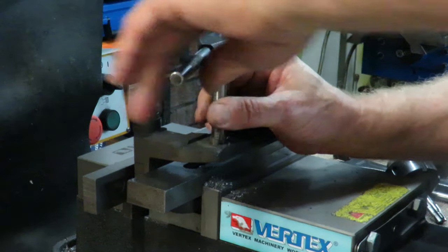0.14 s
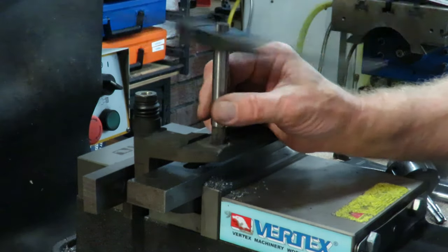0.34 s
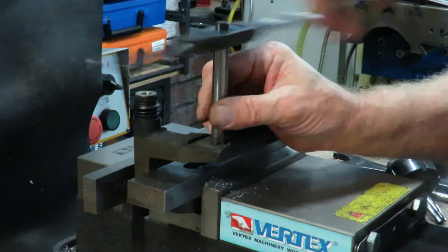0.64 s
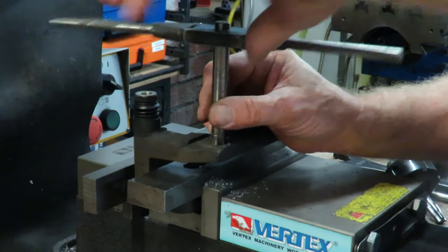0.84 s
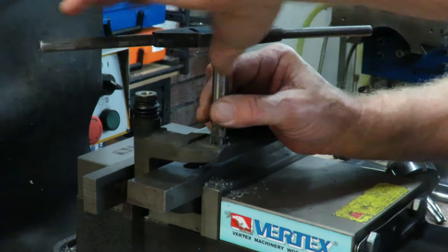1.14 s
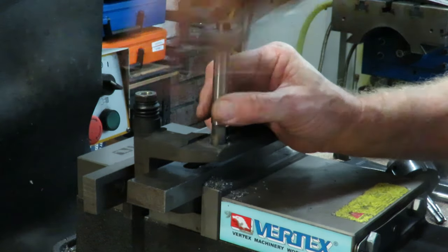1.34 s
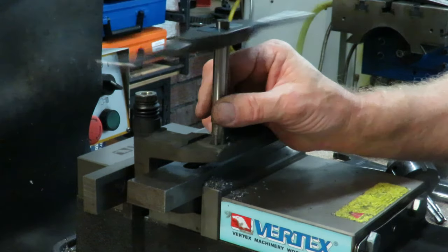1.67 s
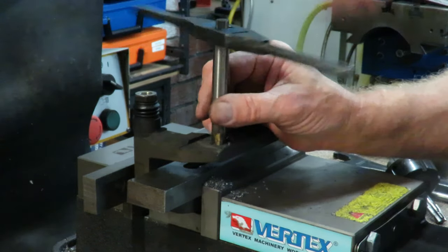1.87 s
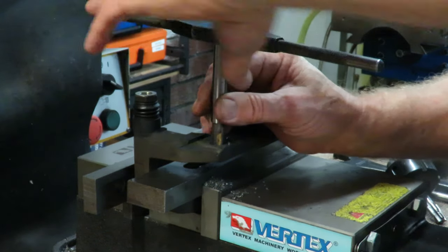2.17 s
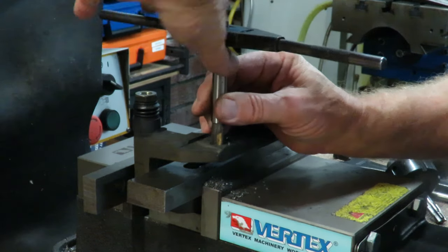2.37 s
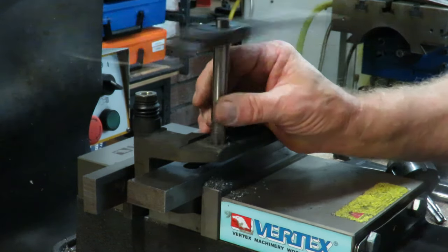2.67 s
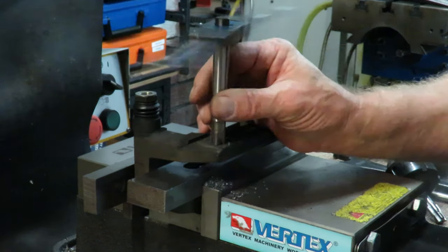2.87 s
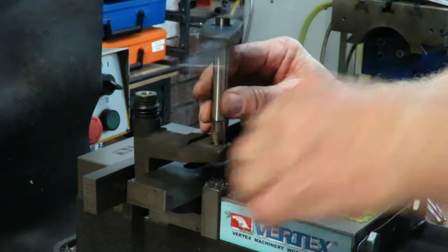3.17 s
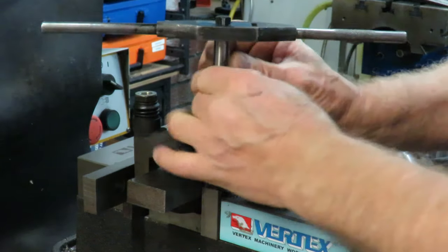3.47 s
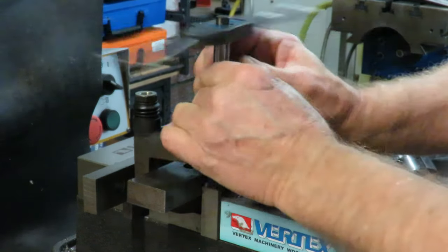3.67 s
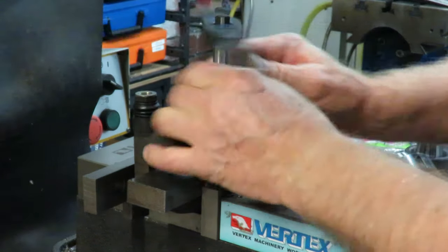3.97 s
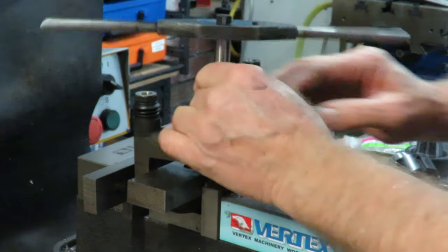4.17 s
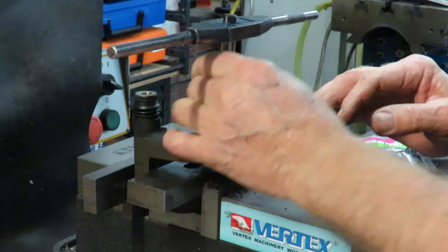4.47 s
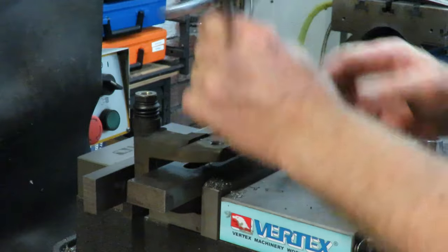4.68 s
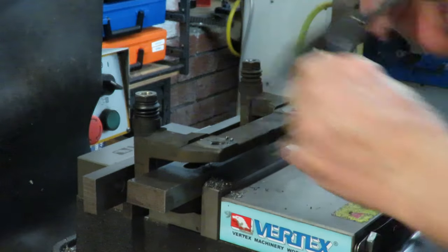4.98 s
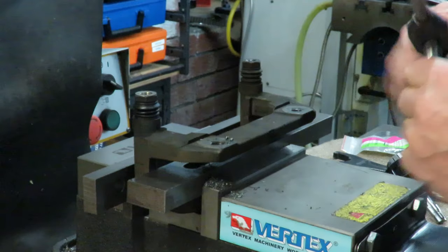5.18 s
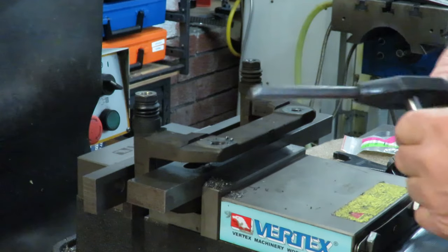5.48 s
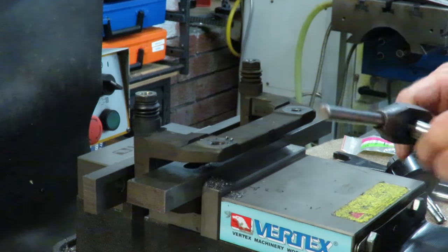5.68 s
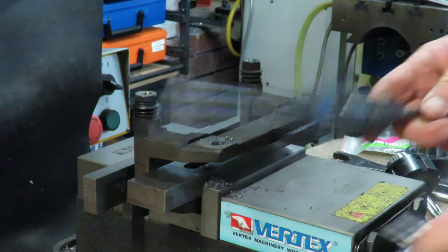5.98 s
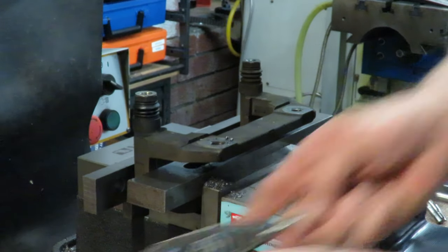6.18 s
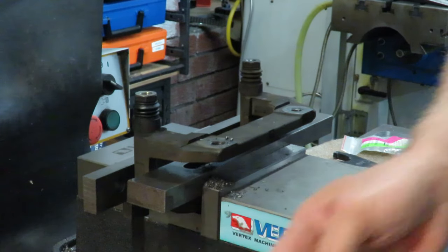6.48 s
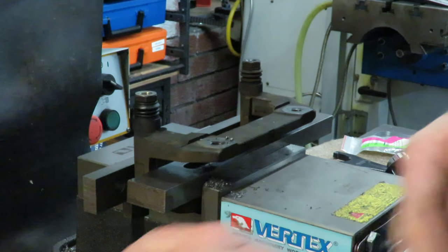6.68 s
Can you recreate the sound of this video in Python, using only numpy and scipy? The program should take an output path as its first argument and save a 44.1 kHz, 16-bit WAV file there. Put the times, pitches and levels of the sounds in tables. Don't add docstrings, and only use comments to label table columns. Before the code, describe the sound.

A close stereo microphone in a small, lightly echoing workshop, with quiet low fan wash and mains hum throughout. From 0 to 0.9 seconds a steel tap turning in a thread gives rough, throaty rasps and hollow knocks, strongest around 0.35 and 0.7. Softer bursts follow at 1.4-1.8 and 2.6-3.0, with near-quiet between them. From 3.1 to 4.7 the loosened tap rocks: faint scrapes, dulled clicks and sharper knocks near 3.85 and 4.3. At 4.79 it comes free with a loud, heavy clunk, low ring and thin high ping, stopped at 5.1 by a firm, ringing catch. Quiet follows, with faint grip ticks. Around 5.8 a soft hiss rises in pitch, then a small bright graze at 5.92. From 6.4 to 6.8 the wrench lands with a woody thump and sharp, jangling clatter among loose tools, briefly buzzing before settling into the hum.

```python
import sys
import numpy as np
from scipy import signal
from scipy.fft import rfft, irfft, next_fast_len
from scipy.io import wavfile
from scipy.ndimage import uniform_filter1d

SR = 44100
rng = np.random.default_rng(int(sys.argv[2]) if len(sys.argv) > 2 else 0)


def store_pcm(level_fs):
    pcm = np.round(np.clip(level_fs, -1, 1) * 32767).astype(np.int16)
    wavfile.write(sys.argv[1], SR, np.atleast_2d(pcm).T)


def gain_from_db(level_db):
    decades = np.asarray(level_db, float) / 20
    return 10 ** decades


N = 300753

# (pitch [Hz], level [dB], time to fall 60 dB [s])
HELD = [(313, -8.5, 0.22), (647, -4.5, 0.55), (976, -12, 0.18), (1286, 1, 0.1), (1500, -6, 0.181),
        (1980, -6, 0.11), (2432, 3.5, 0.054), (3090, 4.5, 0.058), (3540, 1.5, 0.032)]


def evened(x):
    return x / np.sqrt(np.mean(x ** 2) + 1e-20)


def read(points, hz):
    f, value = np.transpose(points)
    return np.interp(np.log(hz + 1), np.log(f + 1), value)


def colour(x, points):
    n = next_fast_len(len(x))
    gain = gain_from_db(read(points, np.fft.rfftfreq(n, 1 / SR)))
    return irfft(rfft(x, n) * gain, n)[:len(x)]


def add(mix, s, sound):
    part = mix[round(s * SR):][:len(sound)]
    part += sound[:len(part)]


def drift(count, size):
    smoothed = uniform_filter1d(rng.standard_normal(count), size=size)
    return evened(uniform_filter1d(smoothed, size=size))


def swell(t, s, db, rise, fade):
    return gain_from_db(db - 30 * np.maximum((s - t) / rise, (t - s) / fade).clip(0, 9))


def resonate(x, peaks):
    out = np.zeros(len(x))
    for k, (hz, width, db) in enumerate(peaks):
        pole = np.exp((2j * hz - width) * np.pi / SR)
        mode = 2 * signal.lfilter([1 - abs(pole)], [1, -pole], x).real
        out += (-1) ** k * gain_from_db(db) * mode
    return out


def wander(x, hz, width):
    turn = np.exp(2j * np.pi * np.cumsum(hz) / SR)
    r = np.exp(-np.pi * width / SR)
    return 2 * (turn * signal.lfilter([1 - r], [1, -r], x / turn)).real


def slips(per_s, spread_db, clump_db, smooth):
    size = gain_from_db(spread_db * np.minimum(rng.exponential(1, N), 4)) * rng.choice([-1, 1], N)
    clumps = uniform_filter1d(rng.standard_normal(N), size=500)
    clumps = evened(uniform_filter1d(clumps, size=300))
    hits = evened(size * (rng.random(N) < per_s / SR))
    hits = hits + smooth * rng.standard_normal(N)
    return evened(hits * gain_from_db(clump_db * clumps))


def knocks(rows, modes, rings_db, crack_db, t60, thud_slow, tick_slow, split_hz, thud_hz, rise, rattle, size=12000):
    out, t = np.zeros(N), np.arange(size) / SR
    hz, ring_db, ring_t60 = np.transpose(modes)[:, :, None]
    low = [(.55 * thud_hz, -32), (thud_hz, -2.5), (1200, 0), (2200, -30)]
    high = [(4500, -9.0), (6500, -7.5), (12000, -7.5), (13500, -5.0), (15500, -11)]
    dying = gain_from_db(ring_db - 60 * t / ring_t60) * np.sin(2 * np.pi * hz * t)
    crack = gain_from_db(crack_db - 60 * t / .012)
    for s, db, thud_db, tick_db, clack_hz in rows:
        clack = [(.3 * clack_hz, -32), (.7 * clack_hz, -9), (clack_hz, 0),
                 (1.4 * clack_hz, -9), (3 * clack_hz, -30)]
        thud, mid, tick = (evened(colour(rng.standard_normal(len(t)), shape)) for shape in (low, clack, high))
        sound = gain_from_db(thud_db) * thud * (1 - np.exp(-t / 0.0031)) * gain_from_db(-60 * t / (t60 * thud_slow))
        sound += mid * (gain_from_db(-60 * t / t60) + crack)
        sound += 1.8 * np.sin(2 * np.pi * clack_hz * t) * gain_from_db(-60 * t / .035)
        sound += gain_from_db(tick_db) * tick * (gain_from_db(-60 * t / (t60 * tick_slow)) + crack)
        place, apart = rng.standard_normal((2, len(modes), 1))
        beats = .6 + .4 * np.cos(2 * np.pi * split_hz * (1 + .1 * apart) * t)
        beats = beats + rattle * np.repeat(drift((len(modes), len(t) // 50), size=4), 50, axis=1)
        rings = gain_from_db(place) * beats * dying
        sound += gain_from_db(rings_db + 10.0) * rings.sum(0)
        add(out, s, gain_from_db(db - 13.5) * (1 - np.exp(-t / rise)) * sound)
    return out


def workshop():
    # (pitch [Hz], level [dB])
    air = [(25, -14), (69, -29), (101, -1.5), (169, -15.5), (204, -8), (267, -11), (399, -4.5),
           (560, -13.5), (1020, -16), (11500, -43), (15500, -51)]
    # (pitch [Hz], likeness [-1 to 1])
    likeness = [(40, 0.98), (70, 0.95), (150, 0.44), (380, -0.37), (950, -0.15), (2380, -0.0), (5980, 0.09),
                (15000, 0.06)]
    # (pitch [Hz], width [Hz], level [dB])
    hum = [(99.5, 6.8, -59), (198.8, 10, -59.5), (311, 4.6, -63.5), (388, 7.3, -75.5)]
    frames, hz = N // 256 + 5, np.fft.rfftfreq(1024, 1 / SR)
    a, b, c, d, patches = rng.standard_normal((frames, 513, 5)).T
    patches = uniform_filter1d(patches, size=12, axis=0)
    patches = evened(uniform_filter1d(patches, size=14, axis=1))
    same = np.clip(read(likeness, hz), -1, 1)[:, None]
    left = a + 1j * b
    right = same * left + np.sqrt(1 - same ** 2) * (c + 1j * d)
    z = np.array([left, right]) * gain_from_db(read(air, hz)[:, None] + 1.4 * patches)
    wash = gain_from_db(-49.5) * evened(signal.istft(z, nperseg=1024, noverlap=768)[1][:, :N])
    t = np.arange(N) / SR + rng.random()
    for line in hum:
        waver = evened(resonate(rng.standard_normal(N), [line]))
        wash += gain_from_db(line[2]) * (1.25 * np.sin(2 * np.pi * line[0] * t) + .4 * waver)
    return wash


def room(x):
    # (pitch [Hz], time to fall 60 dB [s])
    shop = [(150, 0.31), (500, 0.48), (2000, 0.34), (6000, 0.35), (14000, 0.18)]
    taps = np.zeros((2, SR // 2))
    at = np.arange(200, SR // 2 - 20, 20) + rng.integers(0, 20, (2, (SR // 2 - 201) // 20))
    np.put_along_axis(taps, at, rng.choice([-1., 1.], at.shape), 1)
    hz, t, z = signal.stft(taps, SR, nperseg=256)
    tail = signal.istft(z * gain_from_db(-60 * t / read(shop, hz)[:, None]), SR, nperseg=256)[1]
    return signal.fftconvolve(x[None], tail / np.linalg.norm(tail[0]), axes=1)[:, :N]


def brush():
    t, peak_s, width_hz = np.arange(N) / SR, 5.82, 4900
    hz = np.clip(4200 + 56000 * (t - peak_s), 1500, 6000)
    hiss = wander(wander(rng.standard_normal(N), hz, width_hz), hz, width_hz)
    return evened(hiss) * swell(t, peak_s, db=-41, rise=.09, fade=0.048)


def singing():
    t = np.arange(N) / SR
    return np.sqrt(2) * np.sin(2 * np.pi * 4228 * t) * swell(t, 6.63, db=-35, rise=.15, fade=.1)


def chatter(blows):
    # (pitch [Hz], width [Hz], level [dB])
    loose = [(3400, 260, -3), (4240, 160, -12), (5850, 160, -1), (7720, 260, -3), (10400, 260, -1),
             (10950, 260, -2), (12900, 500, -8), (14400, 800, -1)]
    t = np.arange(N) / SR
    buzz = evened(resonate(slips(per_s=900, spread_db=2.0, clump_db=3.0, smooth=.5), loose))
    power = sum(swell(t, s + 0.0014, db - 9.5, rise=0.0088, fade=0.069) ** 2 for s, db, *_ in blows)
    return buzz * np.sqrt(power)


def laid_on_bench():
    # (time [s], crack peak [dB], thud against it [dB], tick against it [dB], clack [Hz])
    blows = [
        (6.404, -26.5, -29, 8.5, 3520),
        (6.4235, -28, -5, -2, 3470),
        (6.4984, -19.5, -26, 9.5, 4330),
        (6.5288, -27.5, -5, 11.5, 3380),
        (6.6095, -23, 10, 10.5, 3930),
        (6.6304, -20, -16, 4, 4100),
        (6.6941, -20, -12, 3, 3620),
        (6.7984, -29.5, 1, -2, 4030),
    ]
    # (pitch [Hz], level [dB], time to fall 60 dB [s])
    tools = [(1034, -12, .1), (2750, -8, .05), (3480, -11, .06), (4237, -4, .04), (5800, -9, .06),
             (7000, -12, .04), (7790, -11, .06), (8699, -12, .05), (10300, -10, .08), (10900, -11, .07),
             (11740, -12, .06), (13360, -13, .06), (14300, -6, .05)]
    # (time [s], crack peak [dB], thud [dB], tick [dB], clack [Hz])
    thumps = [
        (6.396, -54.5, 10, -38, 1310),
        (6.4729, -26, 9.8, -48, 1310),
    ]
    # (pitch [Hz], level [dB], time to fall 60 dB [s])
    board = [(501, -18, 0.12), (774, 11, 0.011), (970, 8.5, 0.013), (1173, 2, 0.034), (1680, -4.5, 0.015)]
    rattles = knocks(blows, tools, rings_db=-3, crack_db=2.0, t60=0.08, thud_slow=0.62, tick_slow=0.9,
                     split_hz=22, thud_hz=496, rise=0.0012, rattle=0.35)
    body = knocks(thumps, board, rings_db=11.7, crack_db=8.0, t60=0.03, thud_slow=5.5, tick_slow=.8,
                  split_hz=5, thud_hz=480, rise=0.0004, rattle=0.071)
    return rattles + body + chatter(blows) + singing()


def touched_in_passing():
    # (time [s], crack peak [dB], thud against it [dB], tick against it [dB], clack [Hz])
    grazes = [
        (5.9182, -24.5, -23, 0.5, 3630),
        (5.9234, -27, -10, 8, 2530),
        (5.945, -33.5, -34, -27, 2820),
    ]
    # (pitch [Hz], level [dB], time to fall 60 dB [s])
    strap = [(2100, -14, .04), (2550, -9, .03), (2820, -5, .04), (3300, -4, .025), (3900, -9, .05),
             (5800, -15, .03), (6616, -14, .03), (10790, -6, .03)]
    return knocks(grazes, strap, rings_db=0.5, crack_db=9.0, t60=0.037, thud_slow=0.68, tick_slow=1.0,
                  split_hz=42, thud_hz=496, rise=0.00065, rattle=0.9)


def caught():
    # (time [s], crack peak [dB], thud against it [dB], tick against it [dB], clack [Hz])
    catches = [
        (5.0968, -16.5, -2, -1.5, 3430),
        (5.2689, -44.5, -4.5, -18, 4060),
    ]
    # (pitch [Hz], level [dB], time to fall 60 dB [s])
    handle = [(501, -8, .15), (670, -9, 0.15), (1150, -3, .06), (1292, -8, .2), (1440, 1, .2),
              (1900, -2, 0.1), (2126, -3, .1), (2998, -8, 0.2), (3440, -9, 0.22), (3630, -8, .18),
              (5860, -6, 0.16), (6002, -8, 0.14), (10200, -8, .12), (12820, -20, .12)]
    return knocks(catches, handle, rings_db=-9, crack_db=3.5, t60=0.18, thud_slow=1.06, tick_slow=0.85,
                  split_hz=12.04, thud_hz=576, rise=0.00042, rattle=0.13, size=SR // 2)


def ping(start_s):
    t = np.arange(N) / SR - start_s
    waver = 1 + 0.5 * drift(N, size=300)
    return (t > 0) * waver * gain_from_db(-37 - 60 * t.clip(0) / 0.7) * np.sin(2 * np.pi * 10918 * t)


def lifted_off():
    # (time [s], crack peak [dB], thud against it [dB], tick [dB], clack [Hz])
    blows = [
        (4.7874, -13.5, 14.5, -5, 1390),
        (4.794, -11, 0.5, 2.5, 3070),
        (4.7965, -18.5, -12, -15, 1965),
        (4.8344, -24, 16.5, -10.5, 1840),
        (4.8644, -35.5, 5.5, -16, 3140),
    ]
    # (pitch [Hz], level [dB], time to fall 60 dB [s])
    freed = [(154.5, -6, 0.3), (313.5, -10, 0.2), (341, -10, .25), (368.5, 4, 0.5), (404, -3, 0.3),
             (436, 0, 0.33), (468, -4, .25), (600, -1, 0.4), (745, -10, .2), (1137, -12, .18),
             (2390, -14, .08), (3160, -16.5, .07), (3760, -8, 0.09), (12400, -13.5, .05)]
    grab_s, settle_s = 5.093, 4.94
    t = np.arange(N) / SR
    free = np.clip((grab_s - t) / 0.0043, 0, 1)
    lift = knocks(blows, freed, rings_db=-7.0, crack_db=17.0, t60=0.1, thud_slow=0.68, tick_slow=0.55,
                  split_hz=13.4, thud_hz=400, rise=0.00021, rattle=0.13, size=SR // 2)
    lift = free * (lift + ping(blows[1][0]))
    body = colour(lift, [(700, 0), (900, -40)])
    seated = np.clip((t - settle_s) / .015, 0, 1)
    low_ring = (1 - .95 * seated) * body
    return lift - body + low_ring, low_ring


def lone_modes():
    # (time [s], pitch [Hz], peak level [dB], time to fall 60 dB [s], rise [s])
    lone = [(3.8470, 4245, -37.5, 0.19, 0.0025), (3.8470, 3070, -46, .15, .004),
            (4.19, 4200, -39, .14, .001), (5.0970, 700, -23, 0.38, 0.019), (.285, 86, -49, 0.22, .01),
            (.36, 600, -27.5, .15, .01), (.3656, 3080, -34, .06, .002), (.425, 930, -16.5, 0.1, 0.0099),
            (.59, 655, -27, 0.079, .006), (.708, 2040, -22.5, .07, .003),
            (1.4272, 4360, -34, 0.026, .002), (1.50, 1217, -25, 0.087, .012),
            (1.57, 1215, -28, 0.073, .01), (1.80, 584, -34, 0.17, .006),
            (3.6087, 3480, -35, 0.029, 0.0012), (3.7768, 3436, -25, 0.033, .0007),
            (3.85, 640, -33.5, 0.21, 0.0055), (4.794, 2350, -21.5, 0.08, 0.00092),
            (5.097, 1800, -27, .06, .001), (6.4050, 5820, -35, .05, .002),
            (6.4050, 3670, -33, 0.024, .002), (6.4240, 3650, -30, 0.037, .001),
            (6.4300, 4240, -34, .05, .003), (6.4988, 4190, -17, 0.031, 0.0008),
            (6.506, 5860, -28, 0.091, 0.0044), (6.4985, 6890, -27, .04, .001),
            (6.4995, 14260, -8, 0.027, .001), (6.4995, 13600, -23, .03, .001),
            (6.4050, 11100, -30, .03, .002)]
    out, t = np.zeros(N), np.arange(SR // 2) / SR
    for s, hz, db, t60, rise in lone:
        waver = 1 + 0.37 * drift(len(t), size=150)
        add(out, s, waver * (1 - np.exp(-t / rise)) * gain_from_db(db - 60 * t / t60) * np.sin(2 * np.pi * hz * t))
    return out


def slack_knocks():
    # (time [s], crack peak [dB], thud against it [dB], tick against it [dB], clack [Hz])
    loose_blows = [(3.6087, -31, -26, 5.5, 3540), (3.765, -38, -6, -6, 1600),
                   (3.7768, -21.5, -31, -3, 3540), (3.8458, -20, -18, 0, 2600),
                   (3.8535, -16, -17, -17, 1400), (3.882, -27, -17, -14, 1400),
                   (4.1032, -29.5, 8, 3.5, 2190), (4.1694, -33, 10.5, 0, 1740),
                   (4.1904, -25, -6, 10.5, 4080), (4.2965, -21.5, -16, -18, 2200),
                   (4.3065, -23.5, -5, -2.5, 3250), (4.6543, -47.5, 16, -15, 1630),
                   (4.6694, -38.5, 9, 2, 1610), (4.6985, -38, -9, -1, 3690),
                   (5.3532, -48.5, -28, -22, 6300)]
    # (pitch [Hz], level [dB])
    soft_top = [(8000, 0), (12000, -1), (14500, -15)]
    slack = knocks(loose_blows, HELD, rings_db=-16.5, crack_db=7.0, t60=0.094, thud_slow=1.8, tick_slow=0.17,
                   split_hz=26.6, thud_hz=462, rise=0.00055, rattle=0.35)
    return colour(slack, soft_top)


def play_knocks():
    # (time [s], crack peak [dB], thud against it [dB], tick against it [dB], clack [Hz])
    play = [(0.0094, -35, 4.5, -2, 3020), (0.2714, -35, -1, -24, 1900), (0.282, -24.5, 7, 3.5, 1980),
            (0.3568, -14.5, -17, -21, 2270), (0.3656, -12.5, -22, 8, 3090), (0.4344, -21, -21, -8, 1840),
            (0.5896, -20, 5, -17, 2070), (0.681, -27.5, -24, 9, 1680), (0.7079, -21.5, 5, -3, 2080),
            (0.8744, -41, 7, -17, 1500), (0.9994, -55, 14, 8, 1950), (1.3988, -36, -5, -8, 2080),
            (1.4272, -42, -25, 8, 4400), (1.4357, -31, -24, -8, 1600), (1.4646, -30, -7, -19, 1980),
            (1.5491, -22.5, -15, -24, 1830), (1.5899, -22, 0, -13, 1500), (1.7992, -29, -11, -37, 1810),
            (1.9882, -34.5, -3, -10, 1580), (2.6392, -34, -20, -1, 2000), (2.6686, -31.5, -19, -4, 1800),
            (2.7135, -29, -13, -8, 1600), (2.7494, -24.5, 8.5, -10, 1720), (2.8806, -47, 1, -13, 1500),
            (3.1398, -36, 6.5, -25, 1500), (3.3126, -31.5, -9, -24, 4100), (3.3307, -28.5, -8, -31, 1560),
            (3.3935, -37, -3, -16, 1980)]
    return knocks(play, HELD[1:], rings_db=-15.5, crack_db=1.0, t60=0.15, thud_slow=0.87, tick_slow=0.31,
                  split_hz=28.0, thud_hz=404, rise=0.0014, rattle=0.68)


def vice(x, drift_db):
    # (pitch [Hz], width [Hz], level [dB])
    jaw_modes = [(330, 60, -9), (560, 60, -6), (646, 60, -5), (790, 70, -5), (931, 50, 0), (1130, 70, -4),
                 (1230, 60, 0), (1340, 60, 0), (1500, 50, -2), (1660, 70, -4), (1990, 90, -5),
                 (2150, 80, -8), (3080, 150, -13), (3550, 200, -22)]
    gains = gain_from_db(drift_db * drift((len(jaw_modes), N // 64 + 1), size=30))
    out = np.zeros(N)
    for k, mode in enumerate(jaw_modes):
        out += (-1) ** k * np.repeat(gains[k], 64)[:N] * resonate(x, [mode])
    return evened(out)


def pushes():
    # (peak time [s], peak level [dB], swell [s], fade [s], fizz against it [dB])
    spins = [(0.0, -44.5, .01, 0.13, -5.5), (0.295, -47, 0.038, 0.41, 6.5), (0.366, -20.5, 0.045, 0.39, -7),
             (0.44, -46.5, 0.19, 0.22, -28), (0.6, -37.5, 1, 0.8, -8), (0.681, -23.5, .012, 0.11, -5.5),
             (0.709, -25, 0.021, 0.048, -0.5), (0.86, -36, 0.35, 0.26, -14.5),
             (1.44, -36, 0.077, 0.27, -7.5), (1.478, -28.5, 0.096, 0.2, -7), (1.515, -27.5, 0.12, .05, -13),
             (1.555, -27, 0.045, 0.27, -9.5), (1.605, -37, 0.12, 0.52, -11), (1.814, -30, 0.063, 0.11, -48),
             (1.995, -54, 0.045, 0.058, 4.5), (2.645, -39, 0.093, 0.25, -5),
             (2.685, -34.5, 0.11, 0.2, -6.5), (2.73, -30, 0.099, 0.17, -10.5),
             (2.754, -31, 0.048, 0.35, -8.5), (2.84, -35, .15, .2, -11.5), (2.89, -36.5, 0.044, .3, -25),
             (2.97, -42.5, 0.084, 0.57, -12)]
    # (peak time [s], peak level [dB], swell [s], fade [s],
    # fizz [dB])
    rocks = [
        (3.06, -44, 0.24, 1, -11.5),
        (3.31, -41.5, 0.29, 0.52, -18),
        (3.618, -31.5, 0.012, 0.068, -24),
        (3.783, -32.5, 0.063, 0.098, -21),
        (3.862, -35.5, 0.063, 0.47, -5.5),
        (4.12, -45.5, 0.15, 1, -2),
        (4.215, -32, 0.14, 0.16, -6.5),
        (4.312, -30, 0.022, 0.092, -16.5),
        (4.66, -37.5, 0.024, 0.067, -8.5),
    ]
    # (peak time [s], peak level [dB], swell [s], fade [s], fizz [dB])
    slide = [
        (5.815, -54, 0.091, 0.13, 5.4),
    ]
    whistle_levels = (-27.5, -41.5, 0)
    fizz_fade, whistle_fade = 1.85, 1.0
    shank_hz, load_hz, unload_s, load_most = 700, 600, 0.14, 2.4
    t = np.arange(0, N + 32, 32) / SR
    rasp, fizz, whistle, load = np.zeros((4, len(t))) + 1e-14
    for rows, whistle_db in zip((spins, rocks, slide), whistle_levels):
        s, db, rise, fade, fizz_db = np.transpose(rows)[:, :, None]
        power = swell(t, s, db, rise, fade) ** 2
        rasp = rasp + power.sum(0)
        strain = np.exp(((s - t) / unload_s).clip(-9, np.log(load_most)))
        load = load + (power * strain).sum(0)
        fizz = fizz + (swell(t, s, db + fizz_db, rise, fade / fizz_fade) ** 2).sum(0)
        whistle = whistle + (swell(t, s, db + whistle_db, rise, fade / whistle_fade) ** 2).sum(0)
    curves = np.sqrt(rasp), np.sqrt(fizz), np.sqrt(whistle), shank_hz + load_hz * load / rasp
    return [np.interp(np.arange(N) / SR, t, c) for c in curves]


def thread():
    # (pitch [Hz], level [dB])
    rasp_shape = [(150, -57), (330, -8), (560, 5), (1500, -3.5), (2400, 8.5), (2800, -0.5), (3100, -24),
                  (7000, -54.5)]
    # (pitch [Hz], level [dB])
    fizz_shape = [(1760, -32.5), (3000, -1.5), (6090, -15), (11500, -30.5), (13200, -21), (14200, -28.5),
                  (15500, -39)]
    # (pitch [Hz], width [Hz], level [dB])
    tap_modes = [(12950, 320, 0), (13350, 340, -1), (13700, 300, -6)]
    # (pitch [Hz], level [dB])
    dead_band = [(1900, 0), (2250, -1.5), (2500, -4), (2800, -3), (3050, 0)]
    rasp_gain, fizz_gain, whistle_gain, shank_hz = pushes()
    flank = slips(per_s=1500, spread_db=1.0, clump_db=2.2, smooth=.8)
    chips = slips(per_s=2500, spread_db=3.0, clump_db=1.8, smooth=0.6)
    shank = evened(wander(wander(chips, shank_hz, width=1400), shank_hz, width=1270))
    rasp = gain_from_db(-9.5) * evened(colour(flank, rasp_shape)) + gain_from_db(1.0) * shank
    rasp = evened(vice(flank, drift_db=4.2) + rasp)
    fizz = evened(colour(chips, fizz_shape))
    whistle = gain_from_db(2.5) * evened(resonate(resonate(flank, tap_modes), tap_modes))
    mix = gain_from_db(-5.0) * (rasp_gain * rasp + fizz_gain * fizz + whistle_gain * whistle)
    return colour(mix, dead_band)


def scene():
    # (pitch [Hz], level [dB])
    reach = [(30, -24), (110, -8.5), (250, 3), (13000, -2), (14800, -18), (16400, -19)]
    # (pitch [Hz], level [dB])
    wide = [(60, -31.5), (140, -13), (250, -13.5), (1000, -18.5), (4000, -13.5), (12000, -2.5)]
    lift, low_ring = lifted_off()
    near = thread() + play_knocks() + slack_knocks() + lone_modes() + lift
    near += caught() + touched_in_passing() + brush() + laid_on_bench()
    near = colour(near, reach)
    echo, other = room(near - .7 * low_ring)
    mid = near + gain_from_db(-7.5) * echo
    turned = signal.hilbert(near, next_fast_len(N)).imag[:N]
    side = colour(0.54 * turned + 0.55 * other, wide)
    return np.array([mid + side, mid - side]) + workshop()


def low_pass(x):
    return signal.sosfilt(signal.butter(12, 16410, fs=SR, output="sos"), x)


def record(dry):
    ceiling, edge_hz = .8, 16200
    rounded = ceiling * np.tanh(dry / ceiling)
    lowpass = signal.firwin(255, edge_hz, window=("kaiser", 9), fs=SR)
    rounded = signal.oaconvolve(rounded, lowpass[None], "same")
    return low_pass(rounded)


dry = scene()
out = record(dry)
store_pcm(out)
```